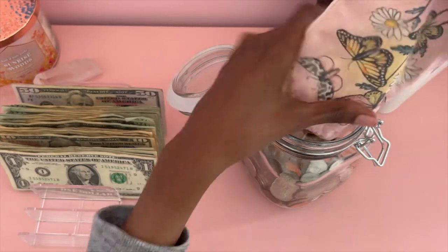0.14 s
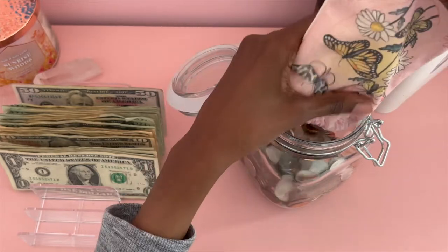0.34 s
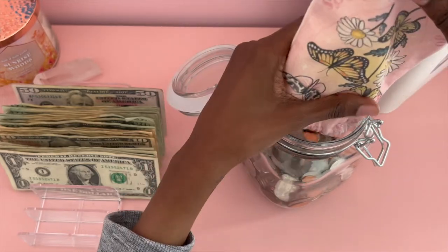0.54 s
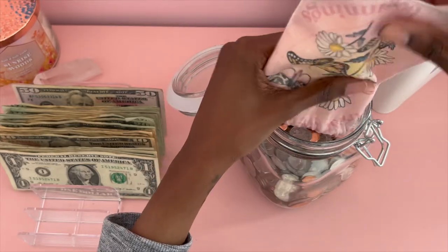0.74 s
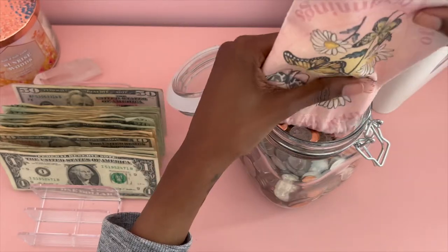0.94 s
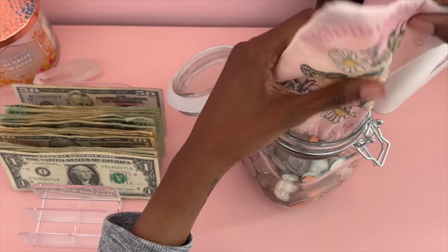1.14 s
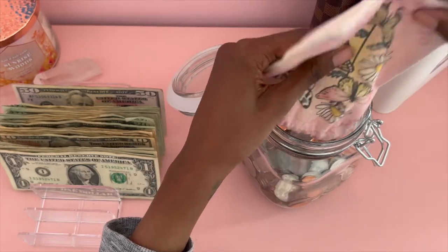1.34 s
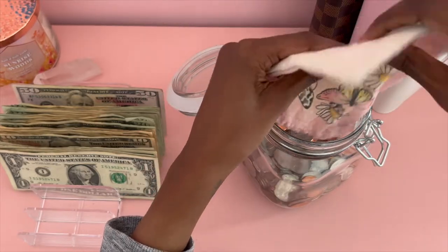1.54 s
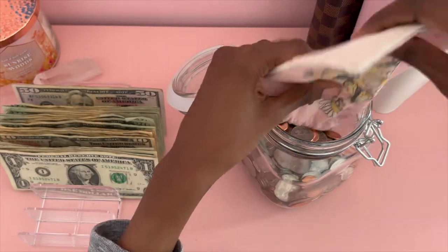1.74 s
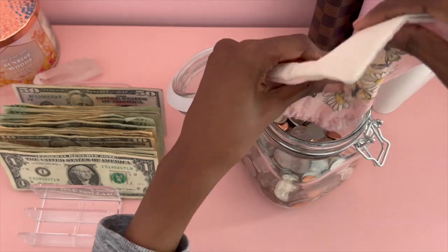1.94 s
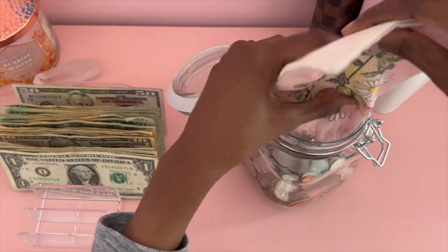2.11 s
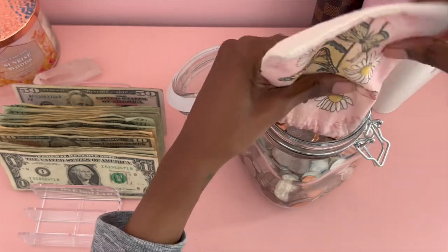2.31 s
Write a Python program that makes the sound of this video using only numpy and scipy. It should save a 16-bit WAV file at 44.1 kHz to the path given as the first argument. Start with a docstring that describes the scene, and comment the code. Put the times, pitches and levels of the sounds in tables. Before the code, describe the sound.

Coins pour into a glass jar: a faint metallic slither, first clinks at 0.2 s, then a loud, bright, crackling crash at 0.33-0.55 s with dull table thuds and high ringing pings. It dies away by 0.75 s. Sparse, much softer clinks follow around 1.2-1.4, 1.6 and 2.0-2.1 s. Close, mono, small quiet room with short echo, low steady hum and faint air.

```python
"""Coins poured into a glass jar

Loose coins slide from a cloth pouch into a jar on a table: one big rush, then a few stragglers.
Landings and small contacts drive decaying modes of table, glass and coins, plus noise-burst cracks.
Single tones, from brief pings to longer rings, are beating sine pairs that flutter until damped.
A short noise-tail room, appliance hum, rumble and air surround it.
"""
import sys
import numpy as np
from scipy import signal
from scipy.fft import rfft, irfft
from scipy.io import wavfile

SR = 44100
rng = np.random.default_rng(int(sys.argv[2]) if len(sys.argv) > 2 else 0)


def output_pcm(signal):
    """Save a mono or channel-first signal as 16-bit PCM at the path in sys.argv[1].

    Samples are clipped to [-1, 1] before scaling.
    """
    pcm = np.clip(np.atleast_2d(signal).T, -1, 1) * 32767
    wavfile.write(sys.argv[1], SR, np.round(pcm).astype(np.int16))


N = 105840


def amp(db):
    """Decibels to linear amplitude."""
    return 10 ** (np.asarray(db) / 20)


def rms_one(x):
    """Scales x to an RMS of 1."""
    return x / np.sqrt(np.mean(x ** 2) + 1e-20)


def in_time(rows):
    """Interpolates each column after the first over the scene's samples."""
    times_s, *columns = np.transpose(rows)
    return [np.interp(np.arange(N) / SR, times_s, column) for column in columns]


def coloured(x, points):
    """Filters x by a (frequency [Hz], gain [dB]) curve, linear over log frequency."""
    hz, db = np.transpose(points)
    f = np.maximum(np.fft.rfftfreq(len(x), 1 / SR), 1)
    gain_db = np.interp(np.log(f), np.log(hz), db)
    return irfft(rfft(x) * amp(gain_db), len(x))


def bandpass(x, order, low_hz, high_hz):
    """Butterworth band-pass."""
    return signal.sosfilt(signal.butter(order, [low_hz, high_hz], "band", fs=SR, output="sos"), x)


def drift(rate_hz):
    """Smoothed random motion of RMS 1, slow or fast by its rate: noise through a double one-pole low-pass."""
    r = np.exp(-2 * np.pi * rate_hz / SR)
    # the first second settles the filter
    return rms_one(signal.lfilter([1], [1, -2 * r, r * r], rng.standard_normal(N + SR))[SR:])


# air noise spectrum: (frequency [Hz], gain [dB])
AIR_SPECTRUM = [(30, -4.5), (140, 1.5), (200, -19), (450, -8), (800, -19), (1500, -26), (2700, -22),
                (6000, -33), (15700, -43)]
AIR_DB = -65


def air():
    """Steady room air: coloured noise."""
    return amp(AIR_DB) * rms_one(coloured(rng.standard_normal(N), AIR_SPECTRUM))


RUMBLE_DB, RUMBLE_LOW_HZ, RUMBLE_HIGH_HZ = -44.5, 3, 13.8


def rumble():
    """Subsonic rumble: band-passed noise."""
    low = bandpass(rng.standard_normal(N + SR), 3, RUMBLE_LOW_HZ, RUMBLE_HIGH_HZ)[SR:]
    return amp(RUMBLE_DB) * rms_one(low)


# appliance hum tones: (frequency [Hz], level [dB])
HUM_TONES = [(58.7, -39), (239.3, -65.5)]
# hum swell, added to the tone levels: (time [s], level [dB])
HUM_SWELL = [(0, -6.5), (.6, -7), (.9, -2.5), (2.4, -2.5)]
HUM_WAVER_DB, HUM_WAVER_HZ = .5, 2.9


def hum():
    """Appliance hum: low sines that swell once, each with its own slight waver in level."""
    t = np.arange(N) / SR
    swell_db, = in_time(HUM_SWELL)
    out = np.zeros(N)
    for hz, db in HUM_TONES:
        level_db = db + swell_db + HUM_WAVER_DB * drift(HUM_WAVER_HZ)
        out += np.sqrt(2) * amp(level_db) * np.sin(2 * np.pi * (hz * t + rng.random()))
    return out


# room decay by band: (lower edge [Hz], t60 [s])
ROOM_BANDS = [(30, 0.39), (1500, 0.38), (9000, 0.28)]
ROOM_DB, ROOM_GAP_S = -6.5, .004


def room(x):
    """Dense echoes: convolution with a noise tail whose bands decay at their own rates."""
    t = np.arange(SR // 2) / SR
    edges_hz = [hz for hz, _ in ROOM_BANDS] + [.45 * SR]
    tail = np.zeros(len(t))
    for (low_hz, t60_s), high_hz in zip(ROOM_BANDS, edges_hz[1:]):
        tail += bandpass(rng.standard_normal(len(t)), 2, low_hz, high_hz) * amp(-60 * t / t60_s)
    tail *= t > ROOM_GAP_S
    return amp(ROOM_DB) * signal.fftconvolve(x, tail / np.sqrt(np.sum(tail ** 2)))[:N]


def ring(clicks, hz, t60_s):
    """Two-pole resonator: a unit click starts a decaying sine of height 1."""
    r, w = amp(-60 / (t60_s * SR)), 2 * np.pi * hz / SR
    return signal.lfilter([0, np.sin(w)], [1, -2 * r * np.cos(w), r * r], clicks + 1e-18)


def strikes(times_s, db):
    """One click per time."""
    out = np.zeros(N)
    np.add.at(out, (np.asarray(times_s) * SR).astype(int), amp(db))
    return out


CHATTER_S = .003


def chatter(clicks):
    """Spreads each strike into a brief run of uneven touches, new for every call."""
    r = np.exp(-1 / (CHATTER_S * SR))
    envelope = signal.lfilter([np.sqrt(3 - 3 * r * r)], [1, -r], clicks + 1e-18)
    return rng.uniform(-1, 1, N) * envelope


STRIKE_SPREAD_DB = 2


def body(modes, times_s, landing_db, contacts, slither_db, split, chattered=True):
    """Modal body: landings hit each mode with random strength; small contacts drive it continuously."""
    luck_db = rng.normal(0, STRIKE_SPREAD_DB, (len(times_s), len(modes)))
    # scaled by the summed energy of the modes
    energy = sum(amp(2 * db) * t60_s for _, db, t60_s in modes) * SR / np.log(1e9)
    small = contacts * amp(slither_db) / np.sqrt(energy)
    out = np.zeros(N)
    for k, (hz, db, t60_s) in enumerate(modes):
        blows = strikes(times_s, landing_db + luck_db[:, k])
        for side in (-1, 0, 1):   # each mode is a close trio
            hit = chatter(blows) if chattered else blows
            drive = hit / 2 + small * rng.uniform(-1, 1, N)
            out += amp(db) * ring(drive, hz * (1 + side * split), t60_s)
    return out


# table modes: (frequency [Hz], level [dB], t60 [s])
TABLE_MODES = [(140.4, -15.5, 0.19), (272.4, -15, 0.091), (352, -6.5, 0.047), (417, -7.5, 0.041),
               (512, -4, 0.014), (613, -1.5, 0.0076), (1041, 1, 0.0065), (1330, -6.5, 0.004)]
TABLE_SPLIT, THUD_LOW_HZ, THUD_HIGH_HZ = .005, 70, 844


def table_thuds(times_s, landing_db, contacts, slither_db):
    """Blunt thuds: landing clicks and small contacts ring the table modes, band-limited."""
    thud = body(TABLE_MODES, times_s, landing_db, contacts, slither_db, TABLE_SPLIT, chattered=False)
    return bandpass(thud, 2, THUD_LOW_HZ, THUD_HIGH_HZ)


# glass modes: (frequency [Hz], level [dB], t60 [s])
GLASS_MODES = [(2430, -4, .045), (2700, -12, .012), (3260, -5, .025), (3375, -1, .026), (3605, -2, .03),
               (4180, -12, .02), (5150, -7, .032), (6050, -14, .032), (6750, -10, .022), (8190, -8, .03)]
GLASS_SPLIT = .005


def glass_ring(times_s, landing_db, contacts, slither_db):
    """Chattering strikes and small contacts ring the jar's short modes."""
    return body(GLASS_MODES, times_s, landing_db, contacts, slither_db, GLASS_SPLIT)


# coin modes: (frequency [Hz], level [dB], t60 [s])
COIN_MODES = [(9300, -13, .03), (9500, -15, .03), (10800, -6, .004), (12700, -17, .025), (13800, -6, .004),
              (15180, -12, .04), (15450, -10, .04), (15660, -10, .03)]
COIN_SPLIT = .007


def coin_ring(times_s, landing_db, contacts, slither_db):
    """Chattering strikes and small contacts ring the coins' high modes."""
    return body(COIN_MODES, times_s, landing_db, contacts, slither_db, COIN_SPLIT)


# crack noise spectrum: (frequency [Hz], gain [dB])
CRACK_SPECTRUM = [(500, -37.5), (1000, -13.5), (2000, -16), (2600, -9.5), (4600, -8.5), (7000, -2.5),
                  (9000, -9), (15800, -6.5)]
CRACK_T60_S = .026


def cracks(times_s, landing_db, contacts, slither_db):
    """Each landing is a short decaying burst of bright noise; small contacts crackle."""
    r = amp(-60 / (CRACK_T60_S * SR))
    envelope = signal.lfilter([1], [1, -r], strikes(times_s, landing_db))
    bursts = envelope / np.e * rms_one(coloured(rng.standard_normal(N), CRACK_SPECTRUM))
    crackle = amp(slither_db) * rms_one(coloured(contacts, CRACK_SPECTRUM))
    return bursts + crackle


# single coin and glass tones, from brief pings to longer rings:
# (time [s], frequency [Hz], level [dB], time until damped [s])
SINGLE_TONES = [(.21, 9250, -42, .1), (.545, 11430, -35, .055), (.605, 11430, -43, .26),
                (.585, 12550, -50, .1), (1.125, 9200, -62, .06), (1.206, 9200, -50, .04),
                (1.345, 9320, -50, .13), (1.614, 3600, -47, .18), (.39, 2425, -25, .035),
                (.4432, 3600, -9, .004), (.5533, 3610, -27, .004), (1.614, 6760, -48, .12),
                (1.805, 9200, -60, .16), (1.855, 11850, -62, .12), (1.89, 12700, -64, .1),
                (2.018, 9340, -46, .09), (2.035, 11900, -51, .06), (2.116, 9340, -46, .16),
                (.21, 15400, -36, .05), (.51, 15250, -30, .17), (1.206, 15240, -37, .04),
                (1.42, 15500, -52, .06), (1.75, 15250, -67, .15), (2.04, 15250, -51, .05),
                (2.116, 15500, -51, .05)]
TONE_T60_S, TONE_RISE_S = .3, .0015
DAMP_S = .008   # per 20 dB of extra fall
FLUTTER_DB, FLUTTER_HZ = 2.5, 70


def single_tones():
    """Beating sine pairs with a rough, random flutter in level, which decay, then are damped."""
    out, flutter_db = np.zeros(N), FLUTTER_DB * drift(FLUTTER_HZ)
    for k, (start_s, hz, db, length_s) in enumerate(SINGLE_TONES):
        t = np.arange(N - int(start_s * SR)) / SR
        decay_db = -60 * t / TONE_T60_S
        damping_db = -20 * np.maximum(t - length_s, 0) / DAMP_S
        # a shifted stretch of the same flutter for each tone
        fall_db = decay_db + damping_db + np.roll(flutter_db, 7919 * k)[:len(t)]
        level = amp(db + np.maximum(fall_db, -200)) * (1 - np.exp(-t / TONE_RISE_S))
        partner = np.sin(2 * np.pi * (hz * 1.003 * t + rng.random()))
        out[N - len(t):] += level * (np.sin(2 * np.pi * hz * t) + .35 * partner)
    return out


CONTACTS_PER_S, CONTACT_SPREAD_DB = 3500, 2.5


def small_contacts():
    """Dense random clicks of uneven size and either sign, RMS 1."""
    size_db = CONTACT_SPREAD_DB * np.minimum(rng.exponential(1, N), 5)
    sizes = amp(size_db) * rng.choice([-1, 1], N)
    return rms_one(sizes * (rng.random(N) < CONTACTS_PER_S / SR))


# landings: (time [s], crack level [dB], table level [dB], glass level [dB], coin level [dB])
LANDINGS = [(0.1971, -14.5, -26, -28, -33), (0.2086, -16, -47, -33, -25), (0.2963, -14, -32.5, -27.5, -41),
            (0.3127, -23, -29.5, -48, -34), (0.3313, -11, -36, -13, -11), (0.3528, 1, -21, 0.5, -34),
            (0.442, -3, -30.5, -9, -30), (0.5077, -42, -29, -53, -46), (0.5447, -19.5, -29, -27.5, -39),
            (0.7174, -36.5, -43, -69, -39), (1.1162, -42.5, -58, -89, -42.5),
            (1.1976, -23.5, -65.5, -44.5, -34.5), (1.2058, -32, -56, -64, -40),
            (1.2454, -24.5, -32.5, -37.5, -28), (1.286, -22, -29, -31, -27),
            (1.2939, -25.5, -35, -48, -43.5), (1.3066, -19, -41, -28.5, -37), (1.315, -25, -46.5, -46, -50),
            (1.416, -34, -42.5, -76, -54), (1.4237, -31, -47.5, -47, -38), (1.58, -40, -70, -55, -48.5),
            (1.6131, -17.5, -61, -38, -56.5), (1.632, -29, -65, -59.5, -63.5),
            (1.8033, -42, -65, -73, -54.5), (2.0181, -25.5, -34, -37.5, -23),
            (2.0915, -32.5, -56.5, -43.5, -41.5), (2.114, -27, -40, -49.5, -37)]
# slither of small contacts: (time [s], crackle level [dB], table level [dB], glass level [dB], coin level [dB])
SLITHER = [(0, -52, -59.5, -97, -39.5), (.19, -54.5, -56, -61, -46.5), (.215, -33.5, -62, -63, -35),
           (.29, -56, -48, -52, -36), (.32, -27, -34, -33.5, -27), (.37, -28, -34.5, -29, -29),
           (.48, -28.5, -37, -40, -41), (.58, -46, -44.5, -41.5, -33), (.66, -50, -52, -64, -63.5),
           (.75, -67, -62, -72.5, -64), (.855, -70.5, -56.5, -81.5, -84.5), (.9, -87.5, -78.5, -85, -91),
           (1.05, -76.5, -64.5, -86, -89), (1.19, -73, -62.5, -84, -77), (1.25, -50.5, -51, -69.5, -48),
           (1.33, -43.5, -52, -51, -82), (1.41, -71, -48, -57.5, -42.5), (1.5, -76, -60, -69, -65.5),
           (1.6, -59.5, -58.5, -66, -72), (1.73, -85, -60.5, -75, -82.5), (1.865, -61.5, -69, -88.5, -53.5),
           (1.93, -88, -71, -93.5, -77), (2.01, -86.5, -72, -94, -75), (2.03, -44.5, -51, -68, -34),
           (2.15, -71, -55, -72, -63.5), (2.26, -85, -78, -89, -86), (2.4, -73.5, -60.5, -84, -84)]
BRIGHT_FROM_HZ = 2700


def coins_in_jar():
    """Landings and slither excite glass, coins and table, and crack."""
    times_s, crack_db, thud_db, glass_db, coin_db = np.transpose(LANDINGS)
    slither_crackle_db, slither_table_db, slither_glass_db, slither_coin_db = in_time(SLITHER)
    contacts = small_contacts()
    bright = glass_ring(times_s, glass_db, contacts, slither_glass_db)
    bright += coin_ring(times_s, coin_db, contacts, slither_coin_db)
    bright = signal.sosfilt(signal.butter(4, BRIGHT_FROM_HZ, "high", fs=SR, output="sos"), bright)
    thuds = table_thuds(times_s, thud_db, contacts, slither_table_db)
    return bright - thuds + cracks(times_s, crack_db, contacts, slither_crackle_db)


TONES_TO_ROOM = .25   # share of the single tones sent to the room


def scene():
    """Jar and single tones, dry and through the room, over hum, rumble and air."""
    jar, tones = coins_in_jar(), single_tones()
    echoes = room(jar + TONES_TO_ROOM * tones)
    background = hum() + rumble() + air()
    return (jar + tones + echoes + background)[None]


TOP, CUTOFF_HZ = .52, 16000


def record(dry):
    """Rounds the peaks with tanh, then cuts the treble steeply."""
    rounded = TOP * np.tanh(dry / TOP)
    return signal.sosfilt(signal.cheby2(20, 60, CUTOFF_HZ, fs=SR, output="sos"), rounded)


dry = scene()
out = record(dry)
output_pcm(out)
```